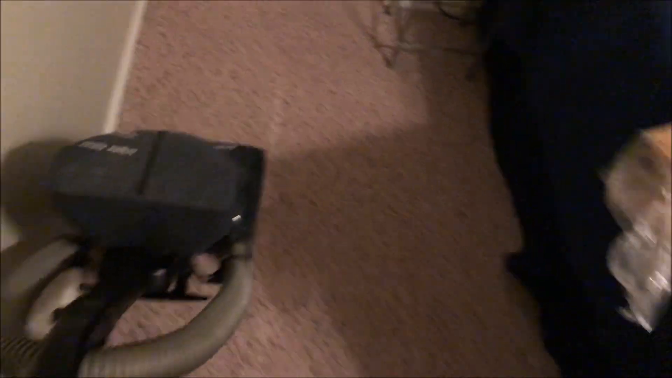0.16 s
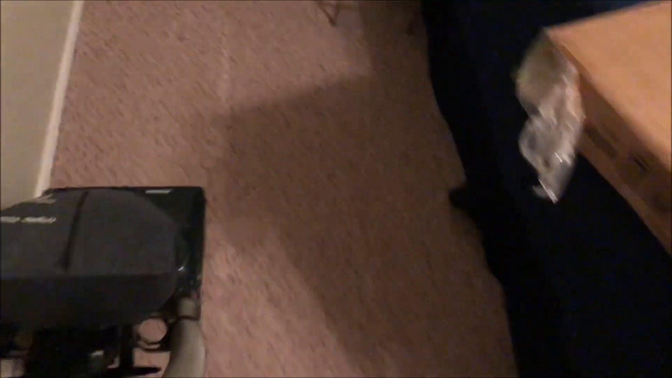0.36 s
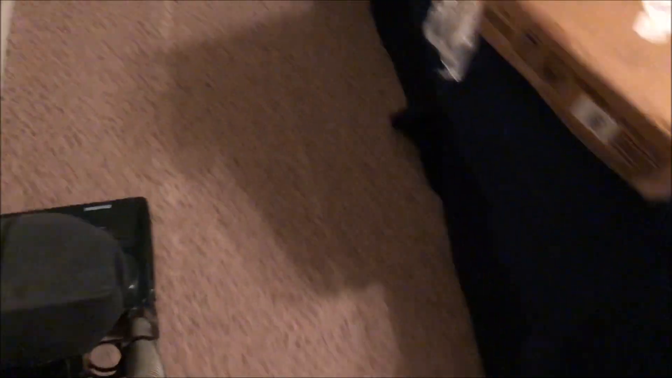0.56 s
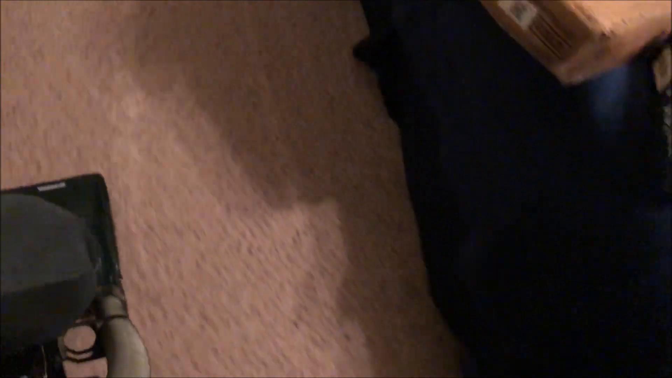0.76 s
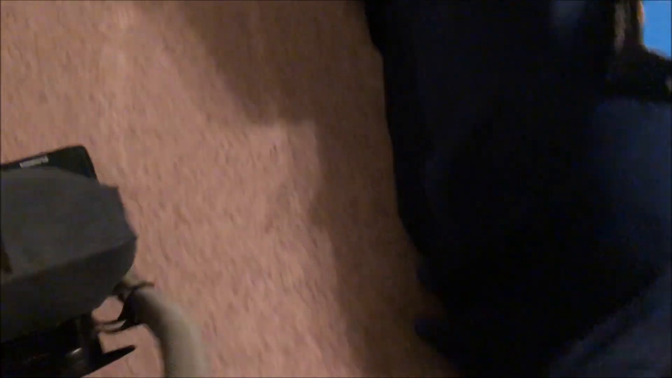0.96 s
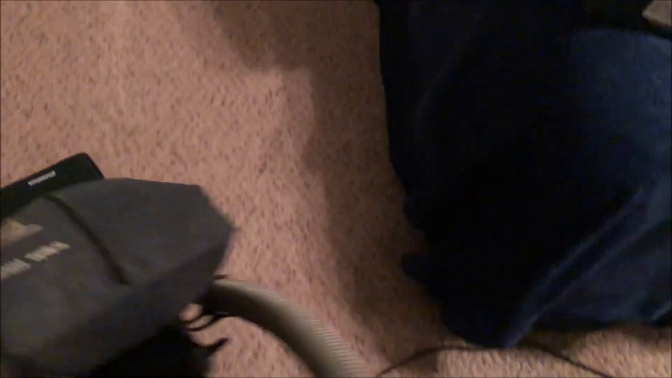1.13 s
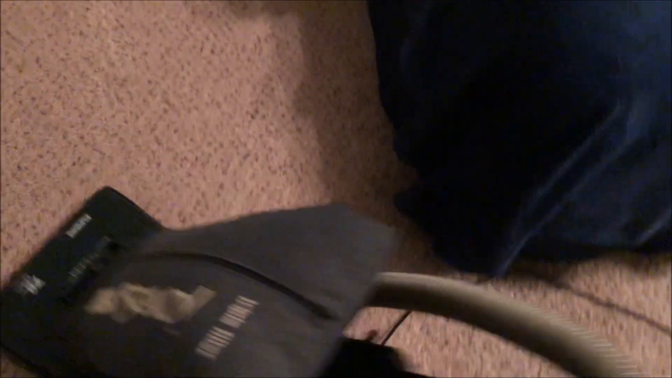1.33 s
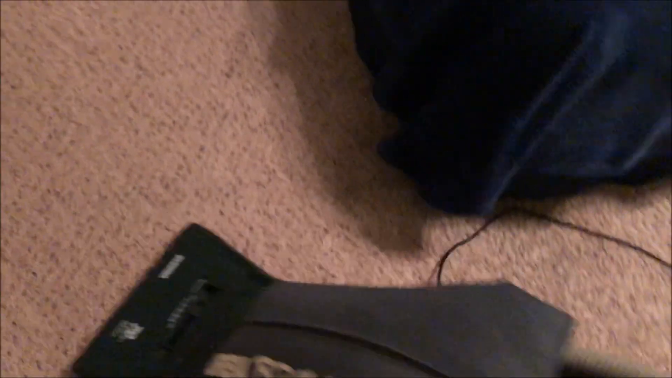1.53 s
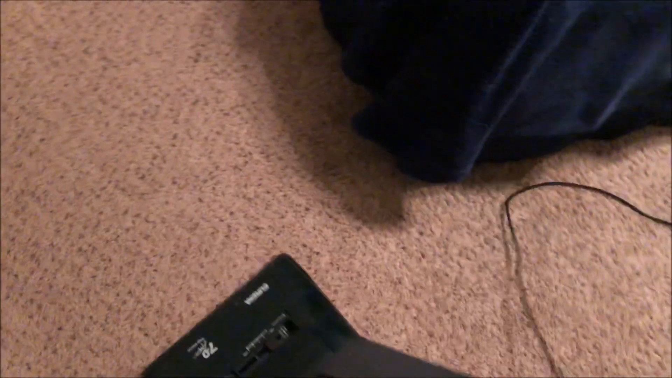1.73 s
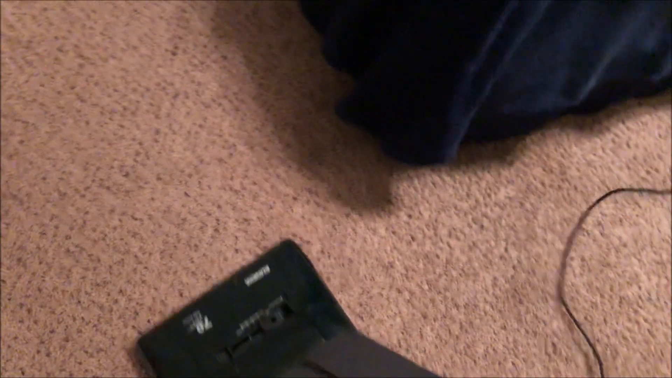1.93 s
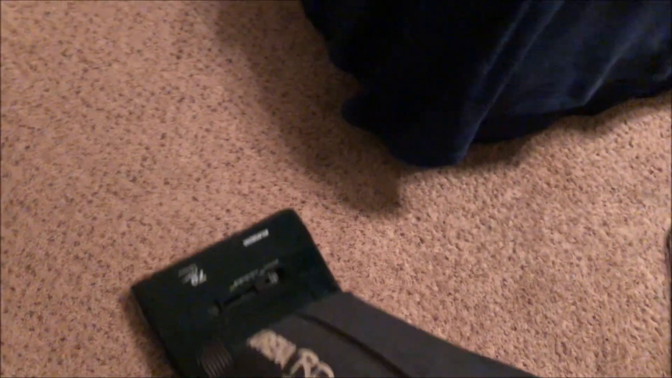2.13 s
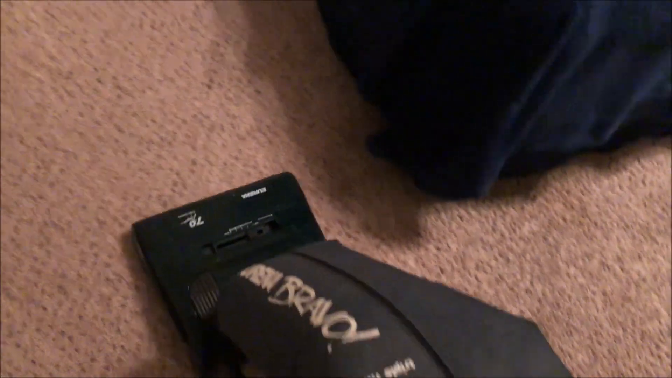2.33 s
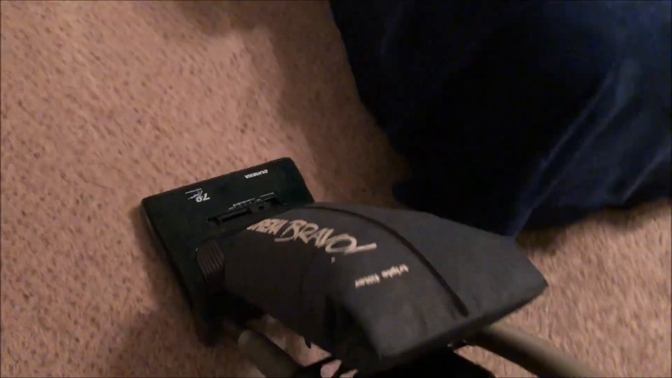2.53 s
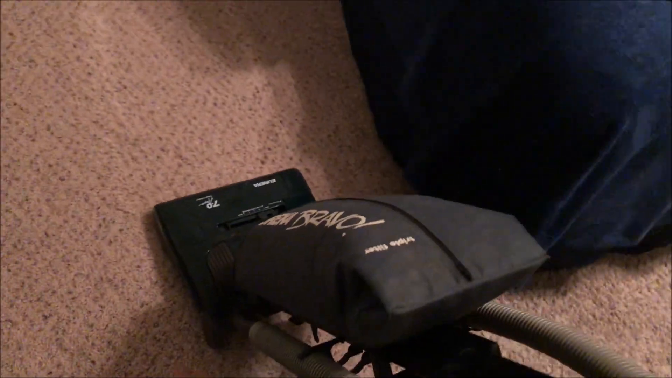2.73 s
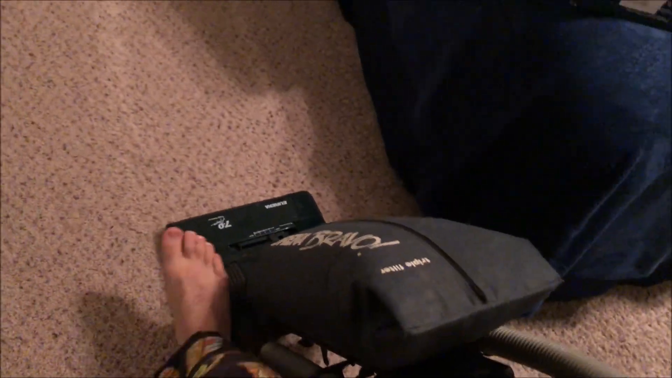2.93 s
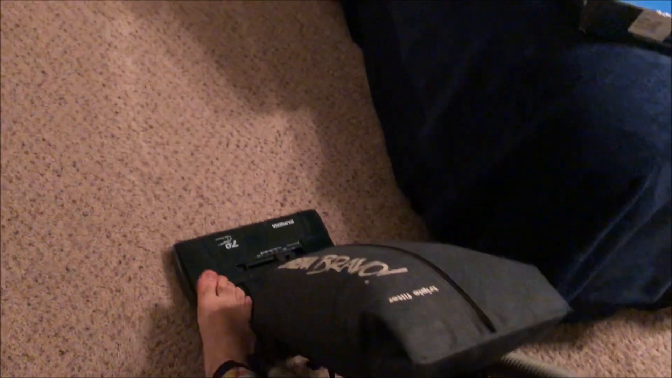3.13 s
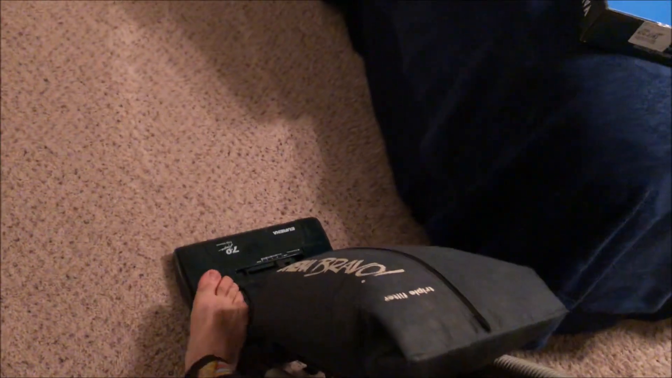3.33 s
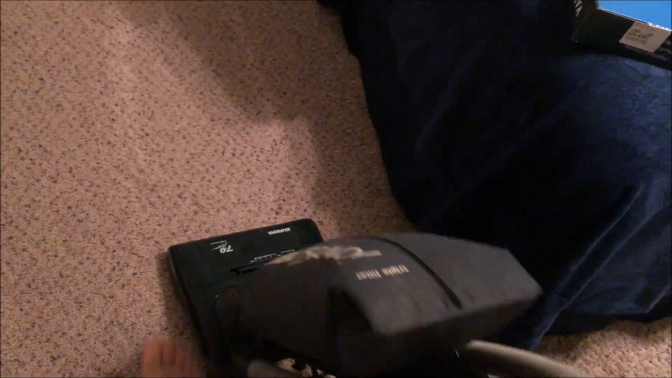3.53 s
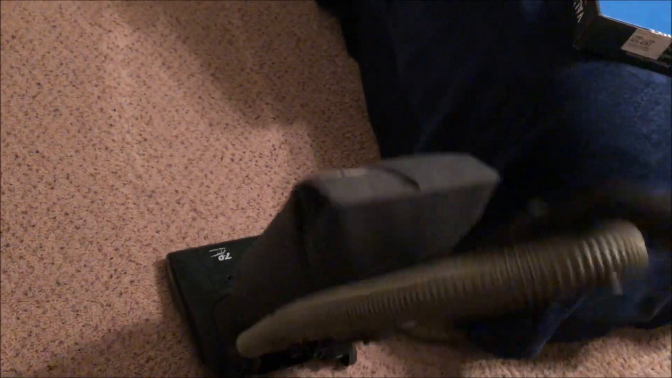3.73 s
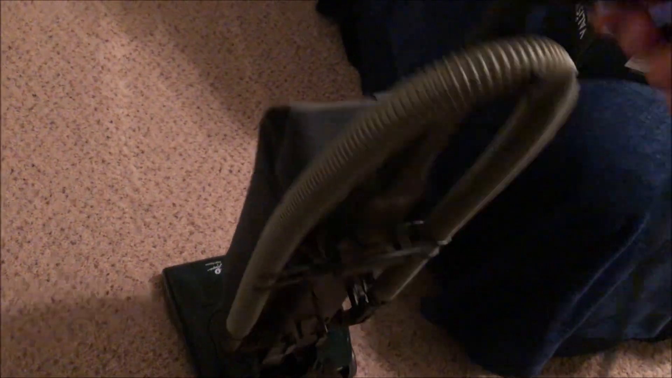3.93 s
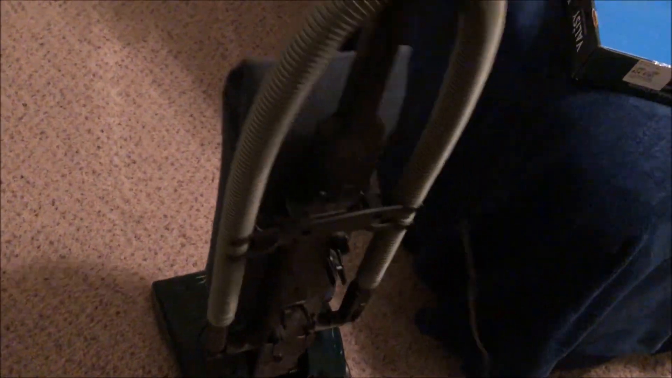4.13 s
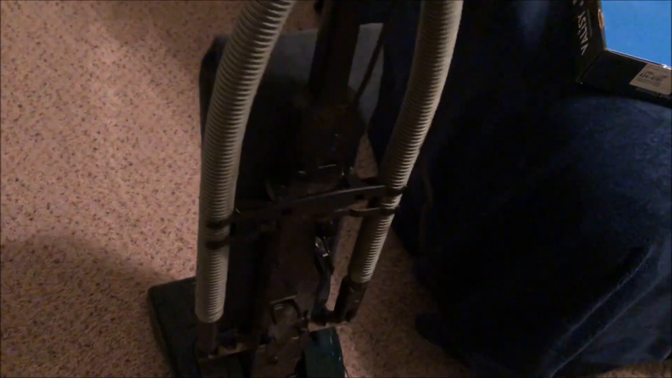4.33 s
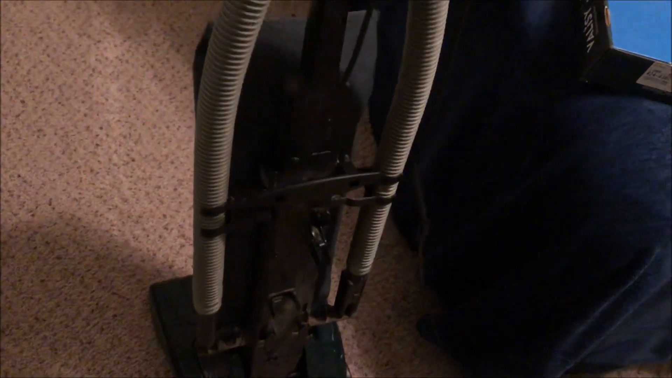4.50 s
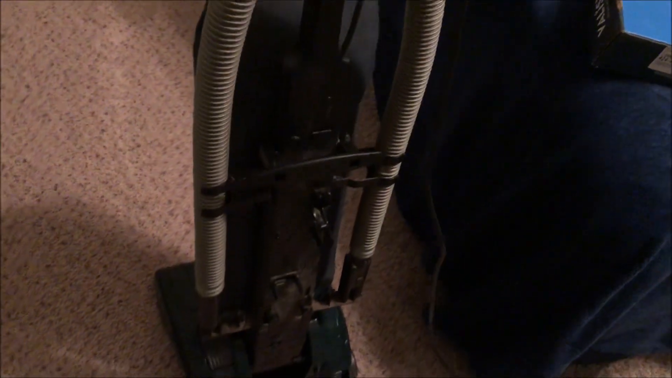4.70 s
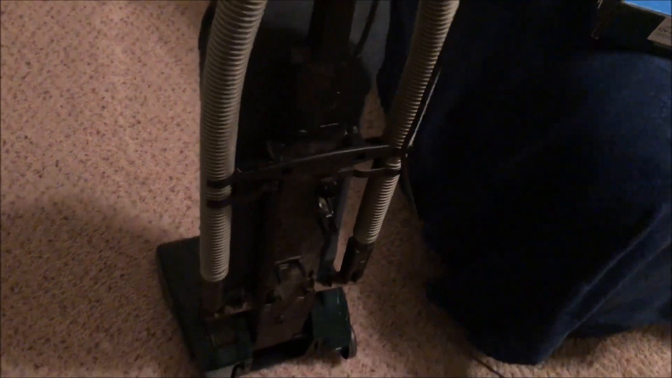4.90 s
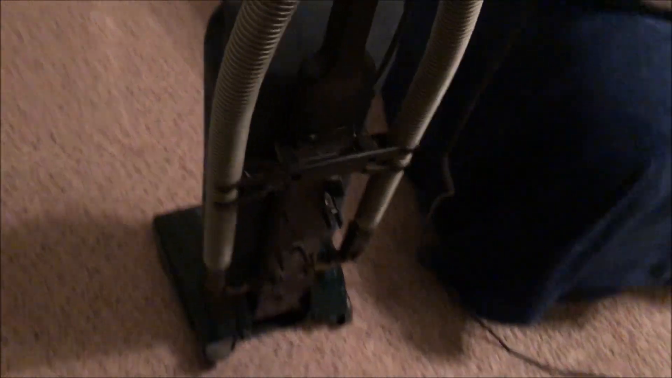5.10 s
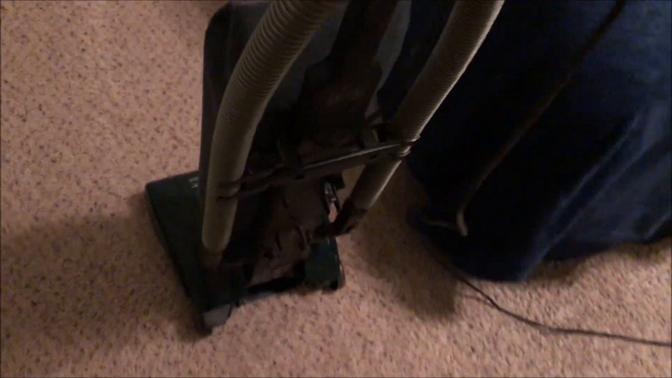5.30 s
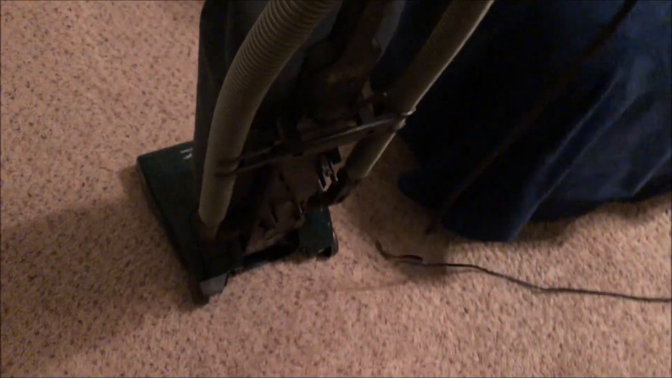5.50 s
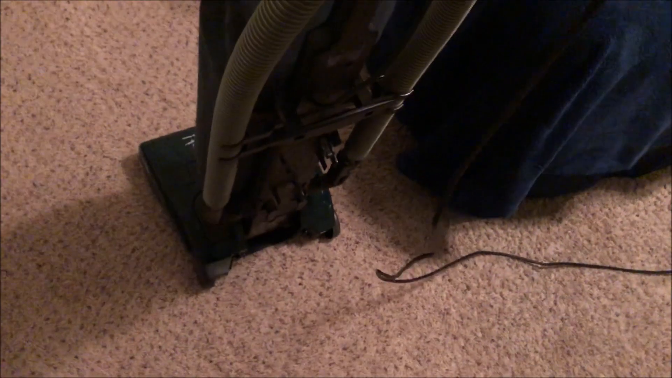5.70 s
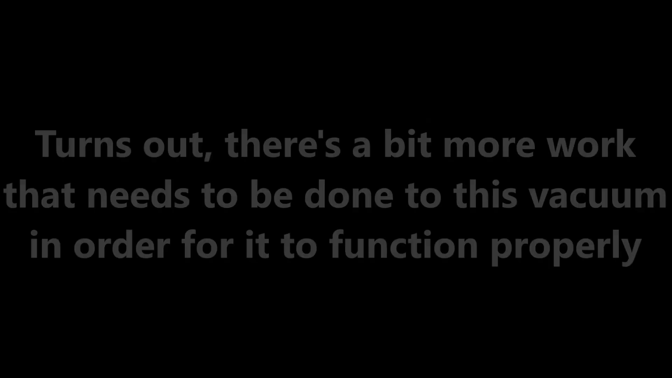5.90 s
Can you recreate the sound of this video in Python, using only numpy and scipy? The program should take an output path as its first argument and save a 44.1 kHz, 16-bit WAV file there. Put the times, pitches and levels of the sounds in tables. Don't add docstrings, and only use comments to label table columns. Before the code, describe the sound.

Vacuum roar with a wavering high motor whine; power cuts, pitch slides down, a sharp plastic clack, then small rattling ticks in quiet.

```python
import sys
import numpy as np
from scipy import signal
from scipy.fft import rfft, irfft
from scipy.io import wavfile
from scipy.ndimage import uniform_filter1d, map_coordinates

SR = 44100
rng = np.random.default_rng(int(sys.argv[2]) if len(sys.argv) > 2 else 0)


def unload_wav(signal):
    wavfile.write(
        sys.argv[1],
        SR,
        np.round(np.clip(np.atleast_2d(signal).T, -1, 1) * 32767).astype(np.int16),
    )


def field_ratio(decibels):
    return 10 ** (np.asarray(decibels, dtype=float) / 20)


N = 262395
T = np.arange(N) / SR
SWITCH_S, STOP_S, END_S = 3.22, 5.21, 5.838
BLADES = 7
BELT = 25.4


def curve(table, t):
    s, *cols = np.transpose(table)
    return [np.interp(t, s, c) for c in cols]


def colour(table, hz):
    f, db = np.transpose(table)
    return np.interp(np.log(hz + 1), np.log(f), db)


def resonances(table, hz):
    return sum(db / (1 + (2 * (hz - f) / width) ** 2) for f, width, db in table)


def bump(x):
    return np.exp(-(2 * x) ** 2)


def walk(rate, shape):
    k = max(int(1 / rate), 1)
    w = uniform_filter1d(uniform_filter1d(rng.standard_normal(shape), k), k)
    return w / w.std()


def shaped(gain_db):
    hz, t, z = signal.stft(rng.standard_normal(N), SR, nperseg=1024, noverlap=768)
    z = z * field_ratio(gain_db(hz, t)) * np.sqrt(SR / 2)
    return signal.istft(z, SR, nperseg=1024, noverlap=768)[1][:N]


def tone(hz, db, rough_db, drift_rad):
    coarse = np.arange(N // 32 + 1)
    sway, slip = (np.interp(np.arange(N) / 32, coarse, w) for w in walk(900 / SR, (2, len(coarse))))
    phase = 2 * np.pi * np.cumsum(hz) / SR + drift_rad * slip + 2 * np.pi * rng.random()
    return np.sqrt(2) * field_ratio(db + rough_db * sway) * np.sin(phase)


def ring(hz, t60_s, length_s=.25):
    t = np.arange(int(length_s * SR)) / SR
    return np.sin(2 * np.pi * hz * t) * np.exp(-np.log(1000) * t / t60_s)


def highs(x, hz):
    return signal.sosfilt(signal.butter(4, hz, "high", fs=SR, output="sos"), x)


def add(out, s, x):
    i = round(s * SR)
    out[i:i + len(x)] += x[:N - i]


# time_s, pitch_hz
BLADE_PASS = [(.15, 1845), (.72, 1841), (1.35, 1844), (1.9, 1838), (1.97, 1826), (2.05, 1803), (2.15, 1791),
              (2.3, 1797), (2.62, 1822), (3.2, 1821)]


def speed(t):
    drag_s, inertia_s = .88, 0.00659
    off_s = np.clip(t - SWITCH_S - inertia_s, 0, None)
    coast_s = STOP_S - SWITCH_S
    share = 1 / (1 + off_s / drag_s) - off_s / coast_s / (1 + coast_s / drag_s)
    return np.maximum(curve(BLADE_PASS, t)[0] * share, 1)


# time_s, facing_db (housing toward microphone), seal_share (nozzle in pile, 1 sealed,
# below 0 lifted)
STROKES = [(0, 0.5, -.2), (.14, -2, .2), (.3, -0.5, 0), (.43, -0.5, 0), (.6, 0, .2), (.98, 2, -.2),
           (1.3, 1.5, 0), (1.54, -1.5, .1), (1.68, -1.5, 1), (2.1, 0.1, .8), (2.4, -2, 1), (2.55, -2.5, .2),
           (3.1, -3.5, -.3), (3.3, -1.5, -.1), (3.65, -0.5, -.1), (4.0, -5, .1), (4.45, -3.5, -.1),
           (4.9, 0, -.1)]


def handling(t):
    return curve(STROKES, t)


# start_s, hold_s, level_db
WHINE_SWELLS = [(0.034, 0.19, -25), (0.332, 0.17, -26.5), (0.566, .01, -40), (0.644, 0.043, -17.5),
                (0.753, 0.044, -18.5), (0.97, 0.19, -17), (1.298, 0.046, -22), (1.405, .08, -28.5),
                (1.515, 0.17, -23), (1.82, .01, -32), (1.89, .01, -25), (1.99, 0.495, -17.5),
                (2.572, 0.073, -21), (2.853, 0.41, -25.5), (3.165, .07, -25.5), (3.268, 0.11, -22),
                (3.43, 0.04, -25), (3.5, .03, -25.5), (3.57, 0.05, -29), (3.706, 0.074, -37)]


def whine_db():
    rise_db_per_s, fall_db_per_s, null_db = 331.5, 204, -37
    swells = []
    for s, hold_s, db in WHINE_SWELLS:
        rise_db = rise_db_per_s * np.clip(s - T, 0, None)
        fall_db = fall_db_per_s * np.clip(T - s - hold_s, 0, None)
        swells.append(db - rise_db - fall_db)
    return np.maximum(np.max(swells, axis=0), null_db - 12 * np.clip(T - SWITCH_S, 0, None))


# level_db, facing_share, seal_db
BLADE_OVERTONES = [
    (-39, -0.84, -7.5),
    (-44, -.8, -4),
]


def blades():
    hz, (facing_db, seal) = speed(T), handling(T)
    levels_db = [whine_db()]
    for db, facing_share, seal_db in BLADE_OVERTONES:
        fade_db = 45 * np.clip(T - SWITCH_S, 0, 1)
        levels_db.append(db + facing_share * facing_db + seal_db * seal + 3.5 * walk(20 / SR, N) - fade_db)
    out = sum(tone(k * hz, db, 1.0, 0.39 * k) for k, db in enumerate(levels_db, start=1))
    late_hz = np.interp(T - .025, T, hz)
    out += (T > SWITCH_S + .05) * tone(late_hz, levels_db[0] - 15.0, 5.3, 0.44)
    return out * (1 - np.clip((T - 3.8) / .15, 0, 1))


def coast_db():
    return -45 * np.clip(T - SWITCH_S, 0, 2)


# turn_multiple, level_db
SHAFT_ORDERS = [(1, -36), (2, -50.5), (4.55, -43.5), (8, -42), (11, -44.5), (13.1, -43), (15.72, -40.5),
                (22, -40.5), (26.2, -55.5), (28.8, -47.5), (30.45, -49), (31.44, -43), (34, -53),
                (41.9, -58), (44, -53)]


def shaft():
    turn_hz = speed(T) / BLADES
    return sum(tone(m * turn_hz, db + coast_db() + 3 * walk(4 / SR, N), 3.0, .6 + m / 16)
               for m, db in SHAFT_ORDERS)


# level_db, bite_db, seal_db
BRUSH_DRUM = [
    (-47, -2.5, 3),
    (-43, 10, -0.5),
    (-41.5, 9, -11.5),
    (-32.5, -1.5, -2),
]
# rise_s (length from the start), release_s (drawn back)
BITE_S = (0.13, 2.15)


def brush_roll():
    turn_hz, seal = speed(T) / BELT, handling(T)[1]
    release_s = 0.21
    bite = np.clip(np.minimum(T / BITE_S[0], 1 - (T - BITE_S[1]) / release_s), 0, 1)
    out = np.zeros(N)
    for k, (db, bite_db, seal_db) in enumerate(BRUSH_DRUM, start=1):
        level_db = db + bite_db * bite + seal_db * seal + 0.46 * k * walk(6 / SR, N) + coast_db()
        out += tone(k * turn_hz, level_db, .1 + .9 * k, .03 + .17 * k)
    return out


# pitch_hz, level_db
MAINS_HUM = [(120, -47.5), (360, -39.5), (480, -40.5), (600, -39.5), (720, -39.5), (1200, -43.5)]
# centre_s, length_s, pitch_hz, lift_db
ROOM_SWELLS = [(.5, 0.23, 360, 5), (.85, .3, 360, 7.5), (1.18, 0.22, 360, 8), (2.0, 0.65, 360, 2),
               (.85, 0.46, 440, 11.5), (1.7, 0.46, 480, 6.5), (0.18, 0.36, 600, 8), (1.5, 0.44, 600, 7.5),
               (.1, .3, 720, 1.5), (0.73, 0.44, 1100, 5.5), (1.9, .5, 720, 2.5)]


def mains_hum():
    out = np.zeros(N)
    for f, db in MAINS_HUM:
        swell_db = sum(lift_db * bump((T - s) / length_s)
                       for s, length_s, hz, lift_db in ROOM_SWELLS if abs(hz - f) < .2 * f)
        out += tone(np.full(N, f), db + swell_db + 1.5 * walk(5 / SR, N), 3.4, .7)
    return out * (T < SWITCH_S)


# level_db, facing_share, seal_db
AIR_LAYERS = [
    (-27.5, 0.82, -5),
    (-21.5, 1., 3.5),
    (-25, -0.36, -0.86),
    (-26.5, 0.23, 0.6),
]
# current_loss_db, speed_power, stall_share (of full speed)
AIR_SPINDOWN = [
    (-2, 0.91, 0.073),
    (6, 0.37, 0.054),
    (5, 0.25, 0.14),
    (0.1, 0.69, 0.24),
]


def flow_db(t):
    facing_db, seal = handling(t)
    share = speed(t) / BLADE_PASS[-1][1]
    cut = np.clip((t - SWITCH_S) / 0.38, 0, 1)
    levels_db = []
    for (db, facing_share, seal_db), (loss_db, power, stall) in zip(AIR_LAYERS, AIR_SPINDOWN):
        flow = np.minimum(share, 1) ** power / (1 + (stall / share) ** 3.12)
        levels_db.append(db + facing_share * facing_db + seal_db * seal - loss_db * cut + 20 * np.log10(flow))
    return levels_db


# low_hz, high_hz
LAYER_BANDS = [
    (90, 450),
    (450, 1600),
    (2000, 5000),
    (5000, 15500),
]
# freq_hz, density_db_per_hz
POWER_ROAR = [(15, -70.5), (25, -46), (59, -18.5), (97, -15.5), (141, -13), (175, -5.5), (277, -5),
              (326, -7), (476, -2), (1610, -9.5), (1790, -9), (1940, -10.5), (2410, -17), (5570, -23.5),
              (16000, -34.5)]
# freq_hz, density_db_per_hz
COAST_ROAR = [(15, -60.5), (25, -27.5), (70, -35), (149, -6), (206, -17.5), (293, -4.5), (354, -10),
              (489, -1.5), (531, -10), (1290, -4), (2050, -7), (3520, -7.5), (4870, -11.5), (8590, -12.5),
              (16000, -28)]
# freq_hz, width_hz, lift_db
DUCT_MODES = [(298, 190, 6), (653, 140, 3), (1387, 520, 3.5), (2283, 32, 4), (3130, 77, 3),
              (3600, 410, 3.5), (4076, 350, 4), (5470, 220, 5), (7610, 160, 4), (8370, 520, 2.5),
              (8870, 93, 5.5), (11200, 300, 1.5), (14600, 1100, -0.5)]
# freq_hz, width_hz, lift_db_per_s
HOSE_MODES = [(1400, 250, -2.5), (2350, 200, 1), (3300, 90, 5.5), (3480, 140, 5), (4320, 200, 5.5),
              (7440, 250, 1.5), (8800, 250, 4.5)]
# centre_s, length_s, freq_hz, width_octaves, lift_db
AIR_PATCHES = [(0.545, 0.31, 1030, .4, 2.5), (1.351, 0.21, 780, .5, 0.5), (1.953, 0.43, 990, .25, -4.5),
               (2.052, 0.34, 550, 0.44, -0.5), (2.405, 0.31, 3600, .5, 2), (2.652, 0.95, 10500, 0.26, 2),
               (2.702, .4, 170, .5, 9), (2.8, 0.75, 900, .35, 4), (3.3, 0.24, 780, .4, -3),
               (3.5, 0.63, 2300, 0.54, -1.5), (3.949, 1, 14700, .2, 6.5), (4.299, 0.37, 1860, .2, 6),
               (.3, .25, 814, 0.54, 3.5), (1.7, 0.2, 686, 0.65, 2), (4.919, .2, 9250, .35, 10),
               (4.97, .25, 4480, .15, -2), (5.001, 0.3, 300, .7, 1.5), (5.05, 0.27, 3405, .25, 3.5),
               (4.901, .3, 12500, .6, 4.5), (4.9, .35, 6300, .5, 6), (0.901, .4, 275, .35, 4.5),
               (2.75, .2, 260, .3, -2.5), (2.0, .3, 510, 0.23, 3.5), (1.3, .3, 640, .2, 3.5),
               (3.1, .35, 3900, .3, 2), (5.0, .2, 5500, .5, 4), (4.55, .1, 14000, .3, -2),
               (1.8, .3, 1500, .35, 2), (1.3, 0.22, 770, .4, 1), (2.55, .3, 4130, .3, 3.5),
               (4.05, .3, 1350, .2, 5.5), (4.3, .3, 3660, .15, 3.5), (4.8, .15, 4470, .15, -4)]


def air(hz, t):
    ducts_db = resonances(DUCT_MODES, hz)
    slow = np.clip((t - SWITCH_S) / 0.23, 0, 1)
    shape = np.outer(colour(POWER_ROAR, hz) + ducts_db, 1 - slow)
    shape += np.outer(colour(COAST_ROAR, hz) + ducts_db, slow)
    shape -= 2.5 * np.outer(np.clip(hz / 2000 - 4.3, 0, 1), np.clip((t - 4.05) / 1.3, 0, 1))
    shape += np.outer(resonances([(1428, 830, 0.5)], hz), np.clip(handling(t)[1], 0, 1))
    shape += np.outer(resonances(HOSE_MODES, hz), np.clip(t - SWITCH_S, 0, None))
    mids = np.log([np.sqrt(lo * hi) for lo, hi in LAYER_BANDS])
    lift = 0
    for k, (db, (lo, hi)) in enumerate(zip(flow_db(t), LAYER_BANDS)):
        power = np.sum(field_ratio(2 * shape[(hz >= lo) & (hz < hi)]), axis=0) * hz[1]
        share = np.interp(np.log(hz + 1), mids, np.eye(4)[k])
        lift = lift + np.outer(share, db - 10 * np.log10(power))
    band = np.clip(4 * np.log2(hz / 40 + 1), 0, 39)
    patches = 1.2 * walk(0.019, (40, len(t))) + 1.09 * walk(.15, (40, len(t)))
    patches = map_coordinates(patches, np.meshgrid(band, np.arange(len(t)), indexing="ij"), order=1)
    ridges = uniform_filter1d(walk(0.011, (len(hz), len(t))), size=2, axis=0)
    near = sum(db * np.outer(bump(np.log2(hz / f + 1e-9) / octaves), bump((t - s) / length_s))
               for s, length_s, f, octaves, db in AIR_PATCHES)
    return shape + lift + near + patches + 2.1 * ridges + 0.4 * walk(0.3, len(t))


# start_s, length_s, start_hz,
# end_hz, level_db
NOZZLE_WHISTLES = [(1.52, 0.06, 1500, 1380, -38.5), (1.635, 0.049, 1400, 1200, -18.5),
                   (1.69, 0.041, 1290, 1200, -22), (1.685, 0.041, 990, 1000, -26),
                   (1.70, .03, 1730, 1720, -31), (1.755, 0.051, 1420, 1426, -25),
                   (1.75, 0.064, 1770, 1690, -23), (1.765, 0.045, 1270, 1250, -21),
                   (1.7, 0.045, 1580, 1800, -22.5), (2, 0.075, 1680, 1850, -21),
                   (1.845, .04, 1100, 1240, -28), (1.935, 0.09, 1142, 1270, -21.5),
                   (1.97, 0.055, 1480, 1800, -19), (2.07, .05, 1180, 1300, -24.5),
                   (2.18, 0.08, 1250, 1500, -24.5), (2.8, 0.25, 1190, 1150, -29),
                   (3.115, 0.061, 1200, 1180, -31), (3.09, .075, 2060, 2060, -37),
                   (5.216, .012, 690, 900, -56)]
# start_s, length_s, start_hz, end_hz, level_db
SQUEAKS_AND_LOW_TONES = [(4.83, .03, 9480, 9500, -44), (4.812, .03, 9450, 9480, -62),
                         (4.855, .04, 9500, 9480, -63), (4.89, .055, 9520, 9500, -68),
                         (4.96, .025, 9500, 9500, -74), (4.772, .03, 8800, 8900, -58),
                         (4.835, .03, 10800, 10800, -60), (4.69, .03, 3450, 3430, -42),
                         (4.79, .04, 3400, 3450, -46), (4.99, .2, 320, 290, -59), (4.835, .03, 6000, 5900, -57),
                         (4.84, .022, 4750, 4750, -53), (5.10, .025, 7300, 7450, -75),
                         (5.117, .022, 10900, 11050, -68), (5.13, .06, 11000, 11000, -82),
                         (4.78, .36, 215, 200, -54), (5.255, .075, 205, 200, -56), (5.345, .045, 205, 225, -55),
                         (5.235, .035, 760, 740, -57)]


def whistles():
    out = np.zeros(N)
    for s, length_s, hz, end_hz, db in NOZZLE_WHISTLES + SQUEAKS_AND_LOW_TONES:
        part = np.clip((T - s) / length_s, 0, 1)
        glide_hz = hz + (end_hz - hz) * part
        out += np.sin(np.pi * part) * tone(glide_hz, db, 1.4 + hz / 2200, 1.1 * max(hz / 1400, 1))
    return out


# start_s, level_db
LATCH_HITS = [
    (4.59, -13),
    (4.5912, -7.5),
    (4.5932, -7.5),
    (4.5975, -17),
    (4.602, -18),
    (4.607, -19.5),
    (4.613, -24),
]
# pitch_hz, level_db, t60_s
SHELL_MODES = [(162, -21.5, 0.12), (433, -16, 0.059), (826, -11, 0.18), (1010, -4.5, 0.008),
               (2024, -7, 0.019), (2730, -15, 0.013), (3380, 4.5, 0.016), (4080, 4.5, 0.013),
               (5200, 4, .008), (6480, 12, 0.0059), (9200, -11, 0.0088), (10500, -12, 0.09)]


def latch():
    t = np.arange(int(.4 * SR)) / SR
    rings, cracks = np.zeros(N), np.zeros(N)
    for s, db in LATCH_HITS:
        for hz, mode_db, t60_s in SHELL_MODES:
            level, detune = rng.standard_normal(2)
            mode = ring(hz * (1 + .03 * detune), t60_s)
            add(rings, s, field_ratio(db) * .35 * field_ratio(mode_db + 2.5 * level) * mode)
        add(cracks, s, field_ratio(db) * 1.31 * rng.standard_normal(len(t)) * np.exp(-t / 0.0039))
    cracks = signal.lfilter([.45], [1, -.55], cracks)
    t60_s = np.array([[.45], [.22]])
    tail = rng.standard_normal((2, len(t))) * np.exp(-np.log(1000) * t / t60_s)
    tail = signal.lfilter([.25], [1, -.75], tail[0]) + .5 * tail[1]
    echo = signal.fftconvolve(cracks + 0.26 * rings, tail)[:N]
    return highs(rings + cracks + field_ratio(-31) * echo, 230.0)


# start_s, peak_db, ring_hz, ring_db
REEL_TICKS = [(5.2245, -47, 1000, 7), (5.227, -51, 980, 15), (5.298, -49, 576, 1), (5.333, -48, 665, 0),
              (5.376, -42, 836, 0), (5.409, -48, 606, -1), (5.433, -48, 1030, -2), (5.455, -44, 640, -10),
              (5.486, -44, 640, -4), (5.523, -41.5, 649, -8), (5.563, -42, 654, -6), (5.613, -40, 656, -7),
              (5.727, -40, 651, -3), (5.234, -53, 780, 14), (5.243, -56, 740, 12), (5.383, -52, 703, 9),
              (5.35, -52, 600, 0), (5.395, -54, 900, 3), (5.42, -54, 800, 3)]


def ticks():
    length_s, bright_db, crack_db = .08, -3.5, -15
    t = np.arange(int(length_s * SR)) / SR
    out = np.zeros(N)
    for s, db, hz, low_db in REEL_TICKS:
        rattle, crack = rng.standard_normal((2, len(t)))
        a, b = 1 + 0.018 * rng.standard_normal(2)
        rattle *= np.exp(-t / 0.0035) + 0.2 * np.exp(-t / 0.03)
        rattle[0] = 4.5
        rattle /= np.sqrt(np.sum(rattle ** 2) / 100)
        hollow = ring(hz, 0.013, length_s) + .6 * ring(1.53 * hz, 0.0088, length_s)
        bright = ring(2550 * a, 0.0065, length_s) + 0.75 * ring(3500 * b, 0.004, length_s)
        bright += 0.6 * ring(1600 * b, 0.007, length_s)
        body = field_ratio(low_db) * hollow + field_ratio(bright_db) * bright
        crack = uniform_filter1d(crack, size=3) * np.exp(-t / 0.0022)
        crack *= 1.9 * field_ratio(crack_db - 2.2 * max(low_db, 0))
        add(out, s, field_ratio(db) * (0.092 * signal.fftconvolve(rattle, body)[:len(t)] + crack))
    return out


# start_s, level_db
MIC_KNOCK = (5.7068, -40)


def knock():
    s, db = MIC_KNOCK
    t = np.arange(int(.08 * SR)) / SR
    fall_hz = 150 + 4000 * np.exp(-t / 0.0003) + 1250 * np.exp(-t / 0.0036)
    envelope = np.exp(-t / 0.0068) * (1 - .8 * np.exp(-t / .0012))
    out = np.zeros(N)
    add(out, s, field_ratio(db) * np.sin(2 * np.pi * np.cumsum(fall_hz) / SR) * envelope)
    add(out, s + .008, field_ratio(db - 7) * ring(95, .08, length_s=.08))
    return out


# start_s, level_db, ring_hz
PIVOT_SLIPS = [(4.182, -36, 14500), (4.244, -37, 12000), (4.286, -38, 15000), (4.356, -36, 15000),
               (4.404, -39, 15000), (4.437, -33.5, 8900), (4.456, -37, 12200), (4.492, -37, 9000),
               (4.535, -47, 14000), (4.672, -29, 7500), (4.676, -40, 12500), (4.7637, -36, 8800),
               (4.765, -41, 15000), (4.769, -40, 7550), (4.834, -53, 15200), (4.839, -51, 14800),
               (4.8435, -37, 9500), (4.847, -42, 15300), (4.85, -41, 4800), (4.854, -58, 15000),
               (4.97, -63, 6500)]


def creaks():
    t = np.arange(int(.08 * SR)) / SR
    out = np.zeros(N)
    for s, db, hz in PIVOT_SLIPS:
        slip = rng.standard_normal(len(t)) * np.exp(-t / 0.0045)
        slip += field_ratio(-12) * signal.fftconvolve(slip, ring(hz, .005, length_s=.02))[:len(t)]
        add(out, s, field_ratio(db) * highs(slip, 6500. - 2500 * (s > 4.8)))
    return out


# time_s, pitch_hz, level_db
LOOSE_PART = [(4.75, 403, -55), (4.95, 403, -60), (5.05, 403, -53), (5.2, 403, -54), (5.23, 406, -70),
              (5.84, 398, -75)]


def singing():
    hz, db = curve(LOOSE_PART, T)
    out = tone(hz, db, 0.62, .1) + tone(np.full(N, 201.), -71, 3.6, 0.94)
    return out * np.clip((T - 4.7) / 0.088, 0, 1)


# freq_hz, density_db_per_hz
ROOM_COLOUR = [(15, -35), (25, -17), (70, -11), (130, 0), (285, -10), (962, -16.5), (1480, -19.5),
               (2280, -22), (2910, -32), (3160, -23.5), (3720, -26.5), (12200, -35.5), (14400, -37),
               (16000, -40.5)]


def room():
    floor = shaped(lambda hz, t: colour(ROOM_COLOUR, hz)[:, None] + 1.5 * walk(.05, len(t)))
    return floor / floor.std() * field_ratio(-62.5)


def scene():
    machine = blades() + shaft() + brush_roll() + mains_hum() + shaped(air) + whistles()
    mono = machine + latch() + ticks() + knock() + creaks() + singing() + room()
    return np.array([mono, mono])


# centre_s, length_s, lowest_hz, depth_share
THIN_MOMENTS = [(3.1455, .018, 300, .8), (3.401, .02, 900, .78), (3.934, .024, 0, .75),
                (4.136, .046, 0, .97), (4.512, .012, 500, .85), (4.827, .014, 3900, .7),
                (5.153, .02, 2000, .75), (5.812, .016, 2700, .7)]
# one row per moment, pitch_hz
THIN_LINES = [(1198, 1827, 2074, 8170), (1068, 1480, 3285, 7866, 8590),
              (270, 612, 1097, 1420, 2660, 3108, 7530, 8604),
              (622, 809, 1140, 1230, 1455, 2300, 3595, 3690, 3879, 4302, 5965, 7394, 8497, 8755),
              (2000, 2900, 3550), (6300, 9500), (1700, 3300), (2500,)]


def thinning(x):
    change, hz = np.zeros(N), np.arange(1025) * SR / 2048
    for (s, length_s, low_hz, depth), kept_hz in zip(THIN_MOMENTS, THIN_LINES):
        size = int(length_s * SR)
        i = int(s * SR) - size // 2
        lines = rfft(x[i:i + size] * signal.windows.tukey(size, .5), 2048)
        gain = -depth * (hz >= low_hz)
        for f in kept_hz:
            inside = np.flatnonzero(np.abs(hz - f) < 30 + .012 * f)
            top = inside[np.abs(lines[inside]).argmax()]
            gain[np.abs(hz - hz[top]) < 1.2 / length_s] = .8 * depth
        add(change, i / SR, irfft(lines * gain)[:size] * signal.windows.tukey(size, .2))
    return change


# centre_s, low_hz, high_hz
SIDE_BANDS = [(.042, 11000, 13200), (.135, 4600, 5800), (.135, 11000, 13200), (.252, 4600, 5800),
              (.252, 9600, 11100), (.368, 9600, 11100), (.484, 7500, 9100), (.484, 9600, 11100),
              (.6, 4600, 6400), (.6, 9600, 11100), (.786, 8900, 10400), (.925, 12400, 13800),
              (1.343, 14400, 15800), (1.552, 13000, 14500), (1.877, 13000, 15200), (1.947, 4200, 5800),
              (1.993, 7500, 9100), (2.063, 9600, 11100), (2.295, 14400, 15800), (2.365, 4600, 7700),
              (2.69, 12400, 15800), (3.06, 13700, 15200)]


def side_noise(x):
    side, hz = np.zeros(N), np.arange(1025) * SR / 2048
    for s, lo, hi in SIDE_BANDS:
        i = int(s * SR) - 1024
        lines = np.abs(rfft(x[i:i + 2048])) * (hz > lo) * (hz < hi)
        noise = irfft(lines * np.exp(2j * np.pi * rng.random(len(hz))))
        add(side, i / SR, .58 * signal.windows.tukey(2048, .6) * noise)
    return side


def band_limit(x):
    return signal.sosfilt(signal.butter(12, 17030, fs=SR, output="sos"), x)


def record(dry):
    mono = 1.1 * np.tanh(dry[0] / 1.1) * np.clip((END_S - T) / .002, 0, 1)
    mono = highs(mono + thinning(mono), 39.0)
    mono = signal.sosfilt(signal.ellip(10, .2, 60, 15800, fs=SR, output="sos"), mono)
    mix = mono + side_noise(mono) * np.array([[1], [-1]])
    return band_limit(mix)


dry = scene()
out = record(dry)
unload_wav(out)
```